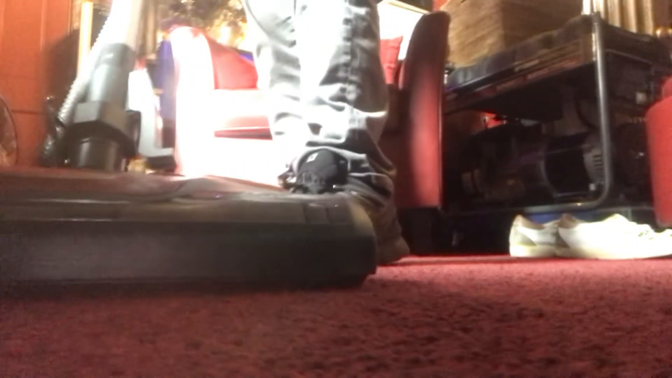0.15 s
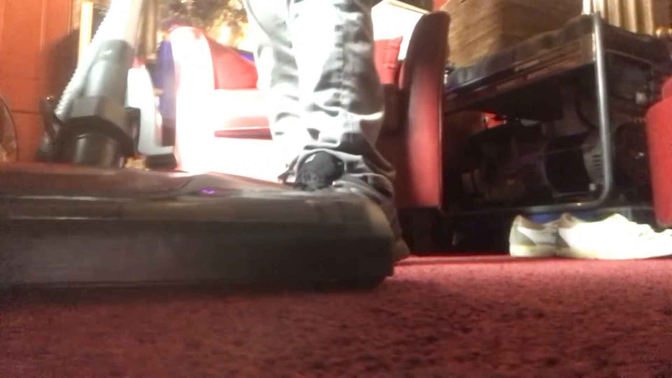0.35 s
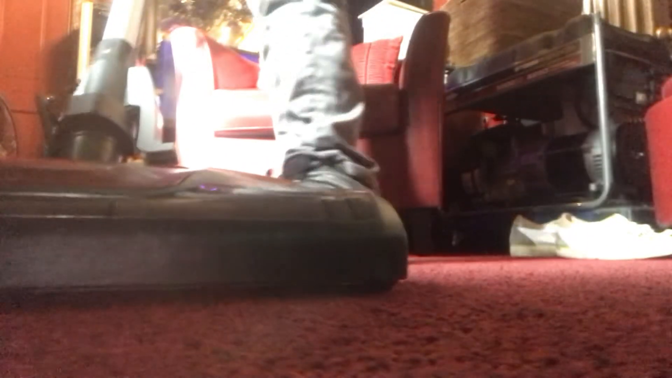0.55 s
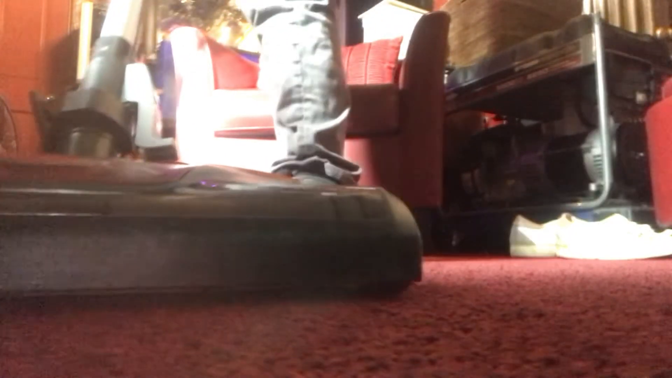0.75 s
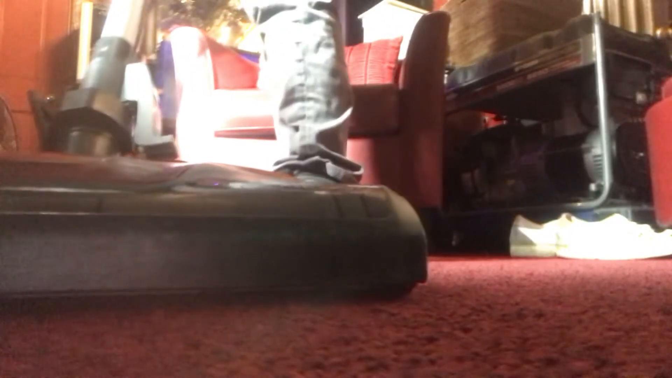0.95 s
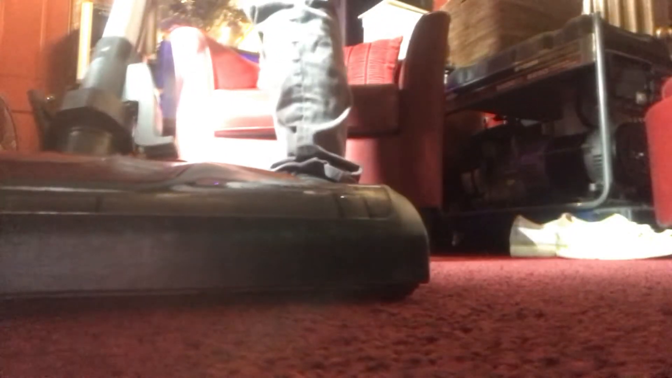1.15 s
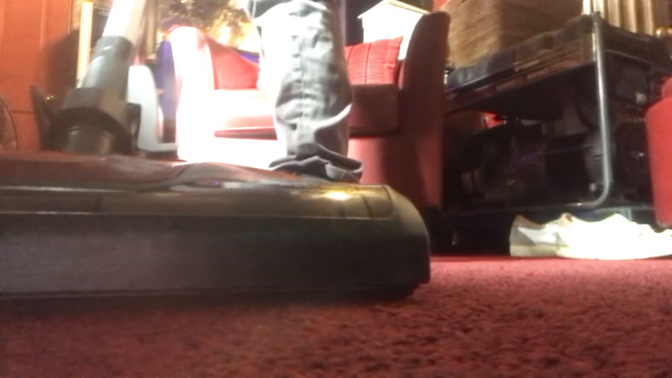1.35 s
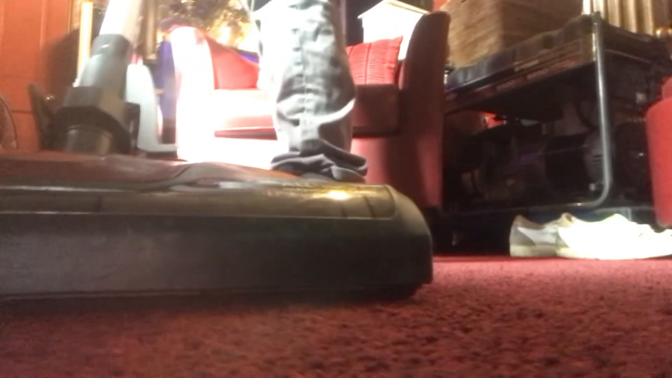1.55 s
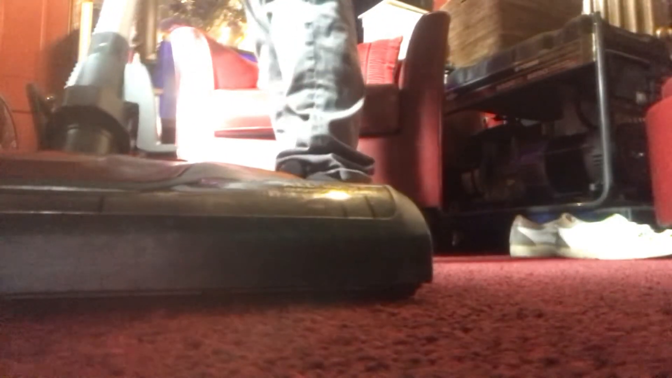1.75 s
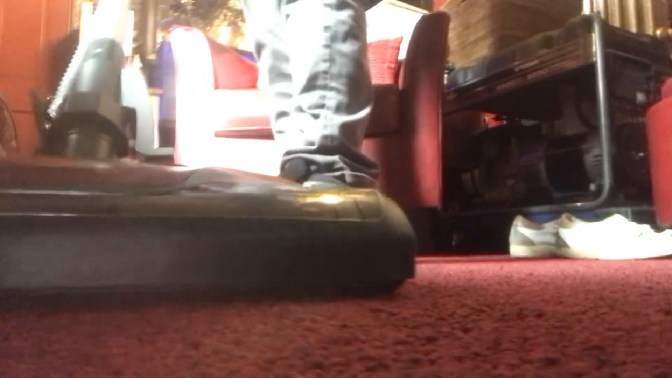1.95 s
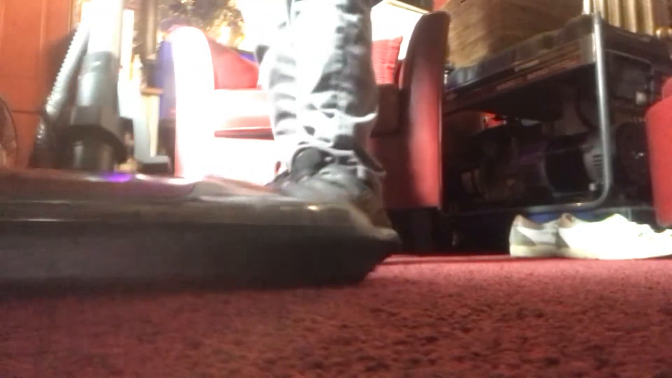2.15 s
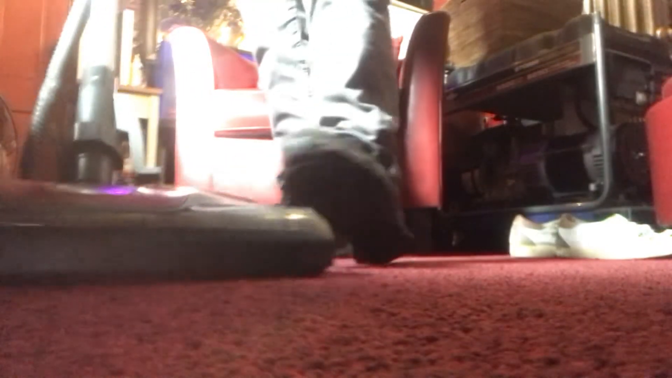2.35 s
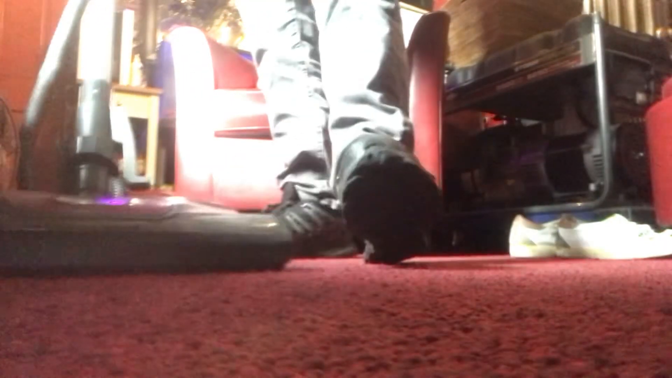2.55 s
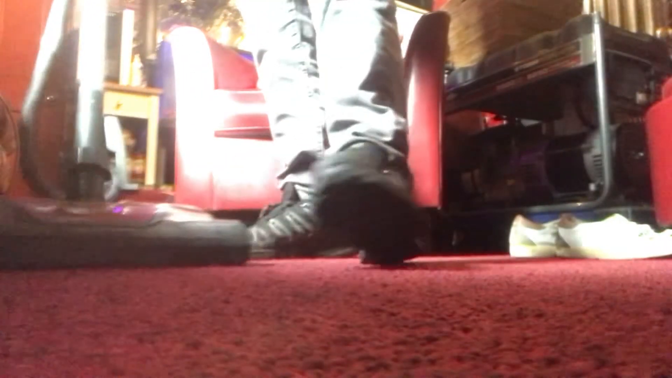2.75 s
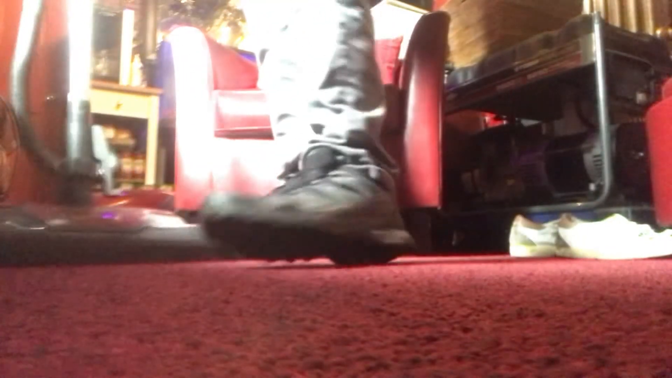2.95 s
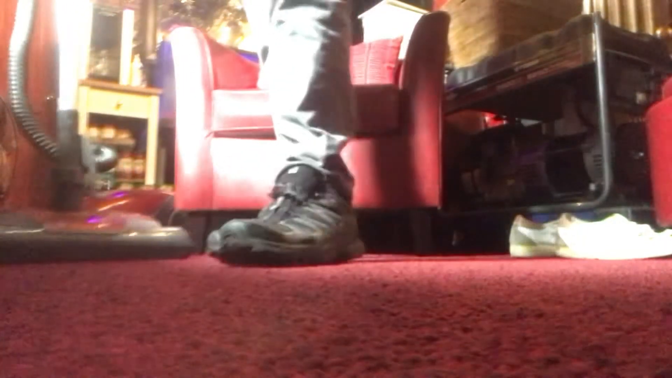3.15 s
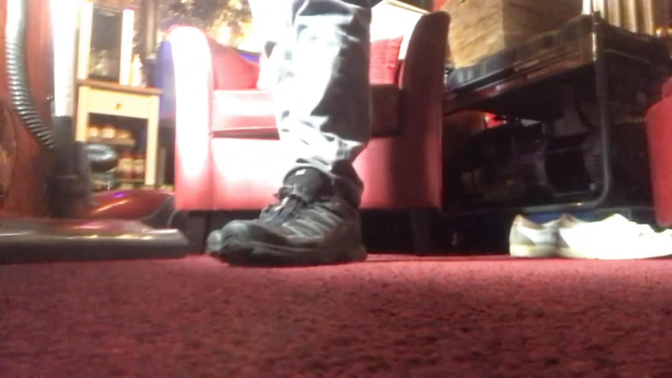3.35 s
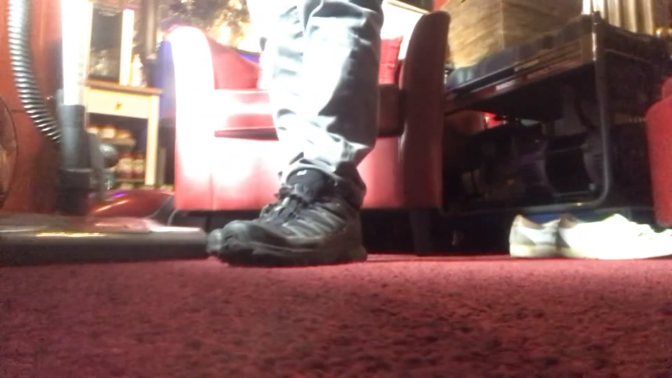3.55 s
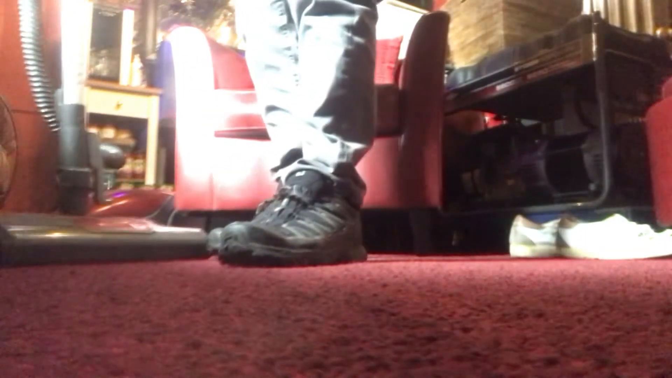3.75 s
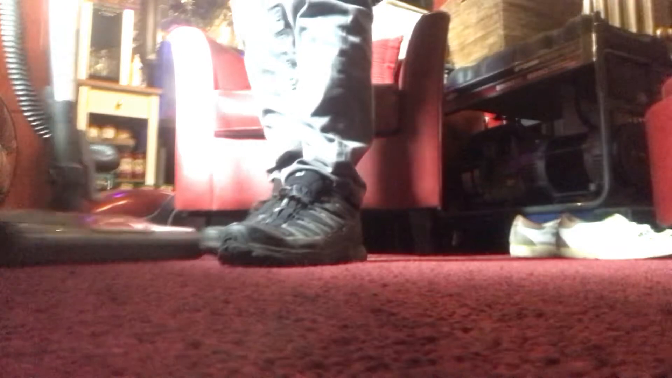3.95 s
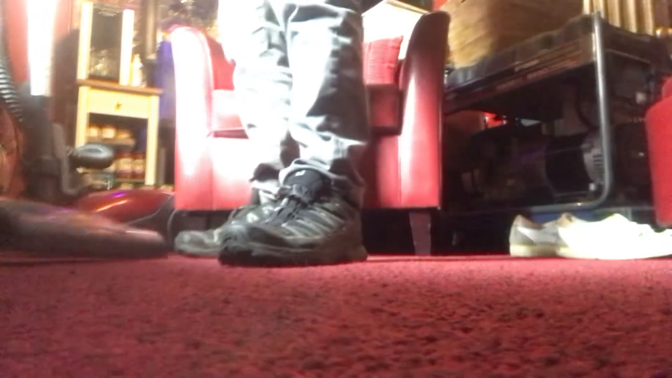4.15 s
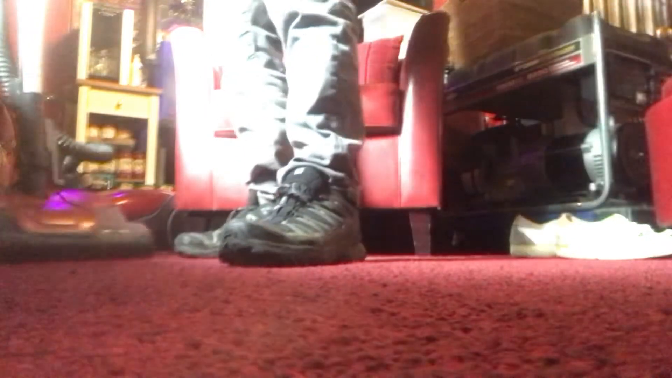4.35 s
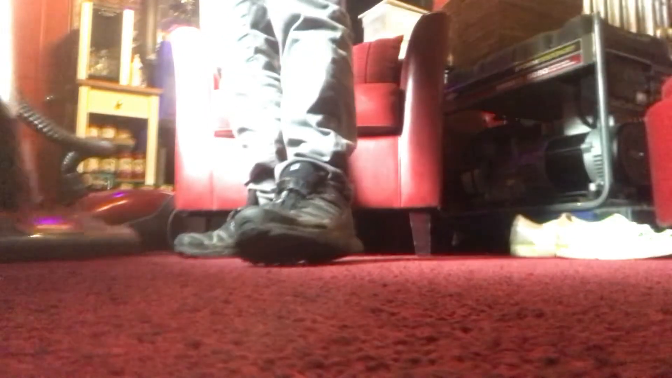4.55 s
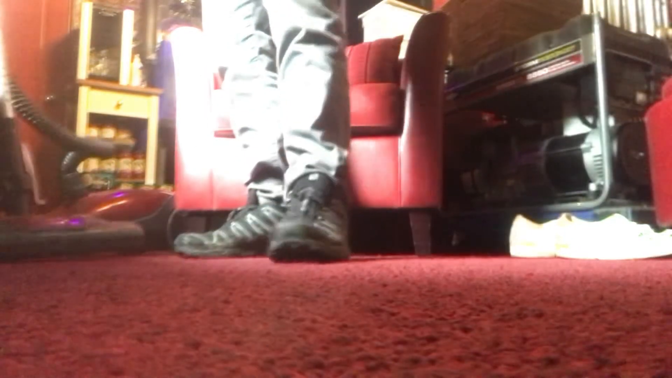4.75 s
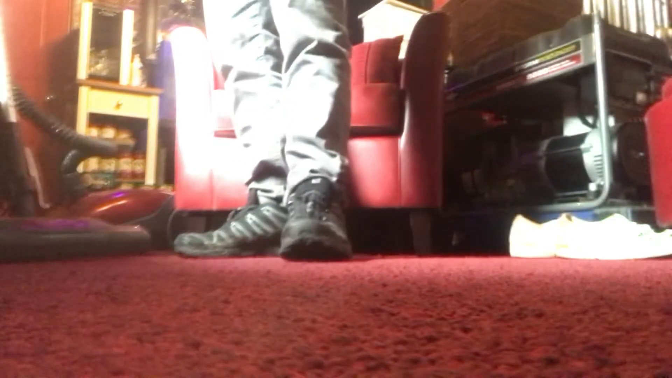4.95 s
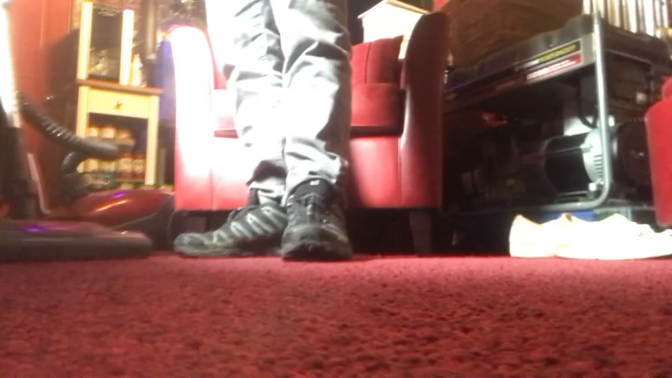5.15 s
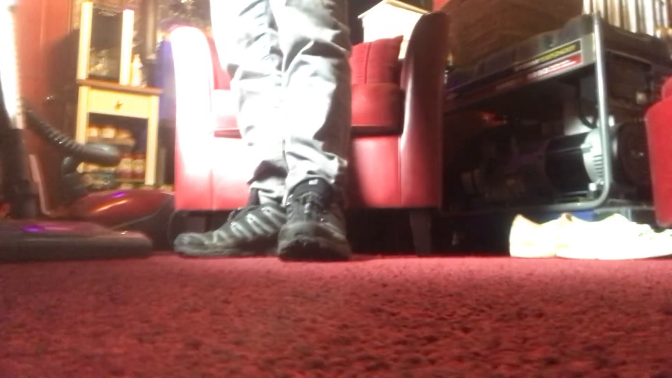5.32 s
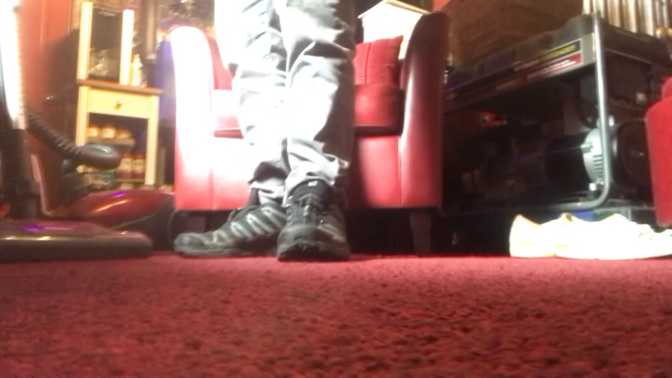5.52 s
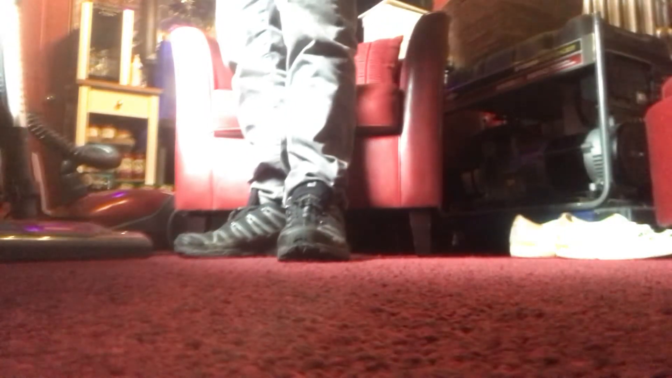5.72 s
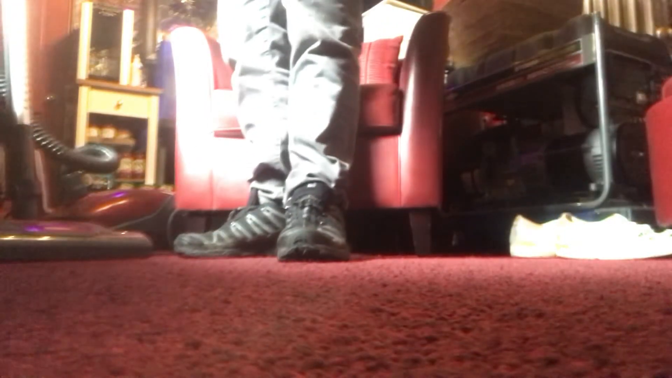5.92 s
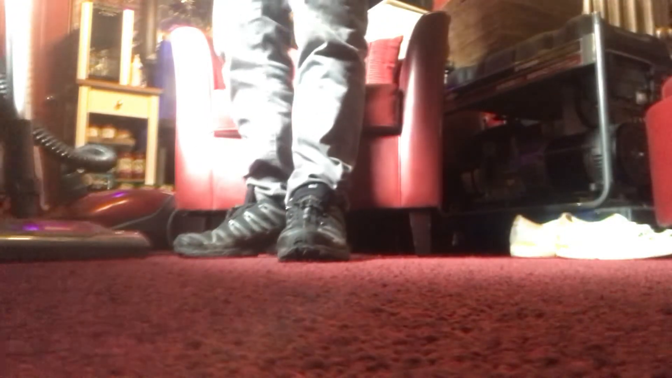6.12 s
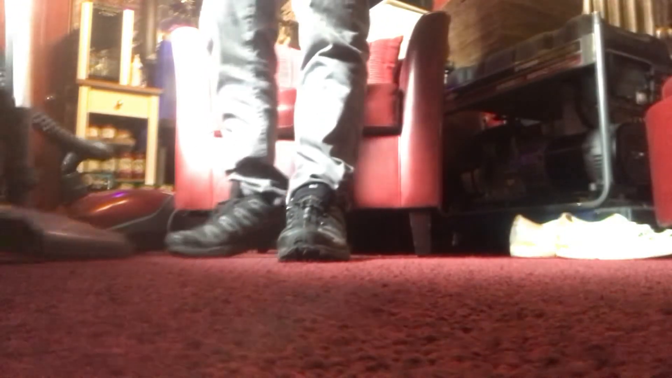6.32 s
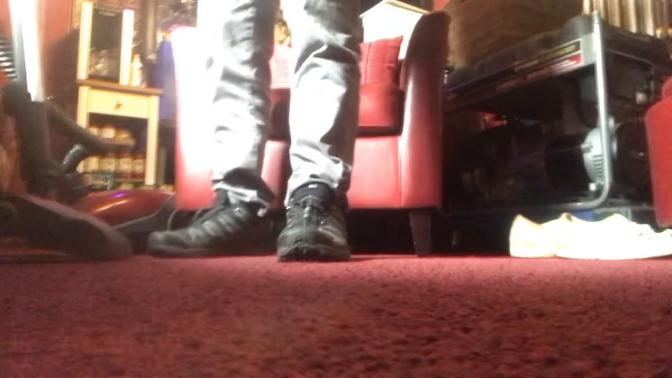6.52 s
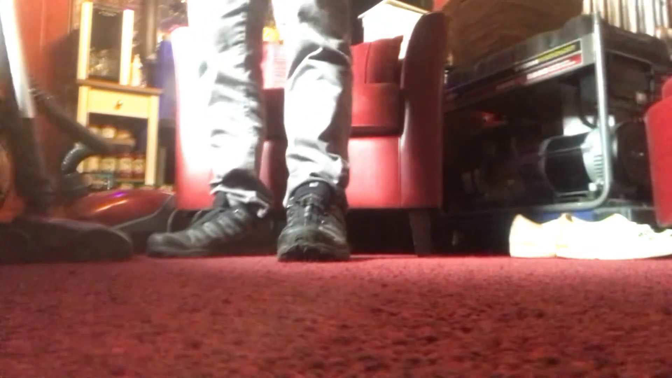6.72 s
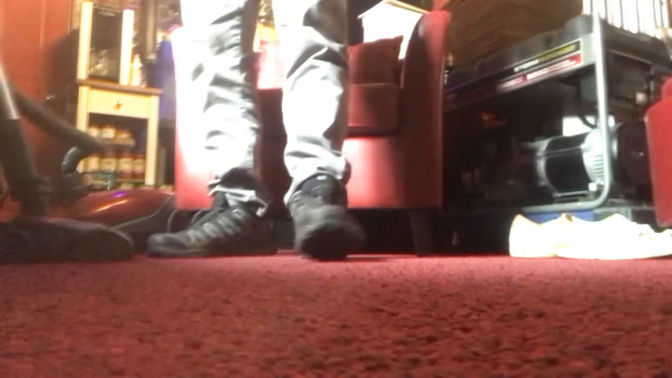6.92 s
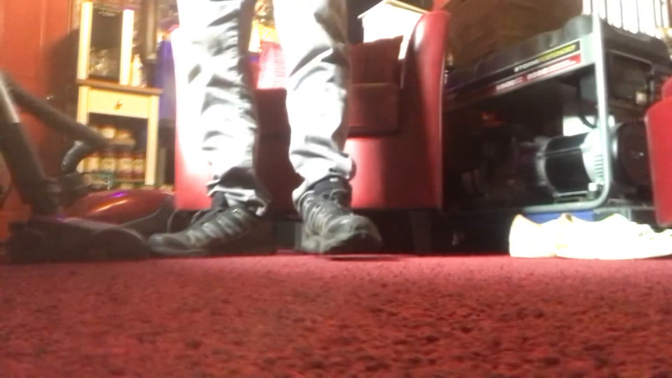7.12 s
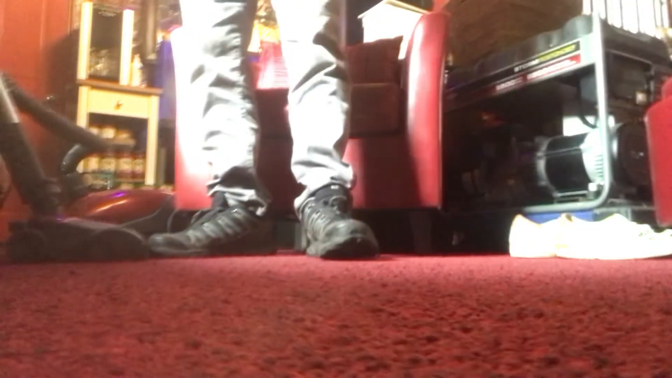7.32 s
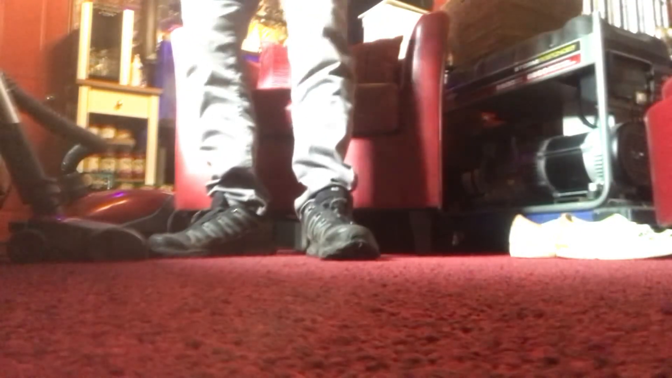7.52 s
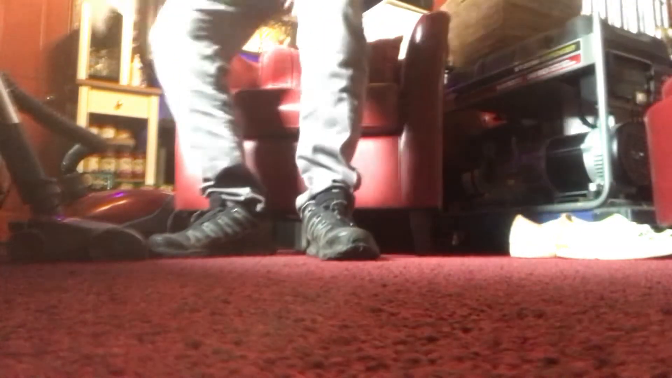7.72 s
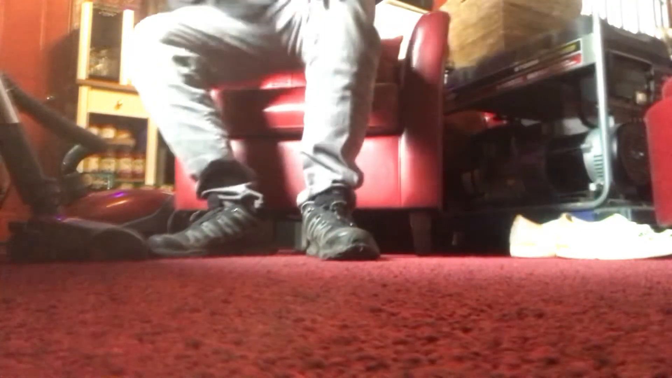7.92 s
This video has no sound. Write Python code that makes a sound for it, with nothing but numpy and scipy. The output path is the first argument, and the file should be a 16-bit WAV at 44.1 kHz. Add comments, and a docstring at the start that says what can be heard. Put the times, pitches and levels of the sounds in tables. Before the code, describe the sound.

A vacuum cleaner runs indoors, heard from floor level: a wavering brush buzz, rushing air, a thin whine and sharp ticks of grit. The brush moves away and stops, then the motor is cut and sinks in pitch as it spins down. Over a low room hum come a few plastic clicks and knocks, shoes and cloth rubbing on carpet, and a soft thump as someone sits down.

```python
"""A canister vacuum's powered brush head works a carpet close by: bristles beat, grit ticks, the fan whines.
From about 2 s the head is drawn back. At 3.2 s its roll loses power and the pile brakes it to a stop.
At 3.5 s the suction fan is switched off; its tones and rush of air fall as it coasts down.
Clicks of hose, wand and shoes, shuffling and, at 7.8 s, a soft thump follow over a quiet room's hum."""
import sys
import numpy as np
from scipy import signal
from scipy.io import wavfile
from scipy.ndimage import uniform_filter1d

SR = 44100
rng = np.random.default_rng(int(sys.argv[2]) if len(sys.argv) > 2 else 0)


def wav_out(sig):
    """Save sig, one row per channel (or a flat mono array), as 16-bit PCM at SR to the path in sys.argv[1]."""
    wavfile.write(sys.argv[1], SR, np.round(np.clip(np.atleast_2d(sig).T, -1, 1) * 32767).astype(np.int16))


N = 356239
T = np.arange(N) / SR

# Powered brush roll. Each row: time in seconds, beat rate in Hz, regular share 0-1, buzz swell in dB,
# lean from the third to the second harmonic in dB.
ROLL_PATH = [(0, 164.3, .9, -1.5, -2.5), (.15, 162.5, 0.93, 2, -0.5), (.28, 156.1, 0.92, 1, 5),
             (.43, 153.7, 0.75, -1.5, 7.5), (.65, 151.5, 0.78, -0.5, 3.5), (.82, 152.7, 0.93, 1, -1.5),
             (1.3, 155.5, 0.93, -1, -2), (1.63, 155.7, 0.87, -2, -1.5), (1.8, 159.1, 0.89, -1, 1),
             (2.1, 163.9, 0.55, -.5, 4.5), (2.56, 164.6, 0.51, -1, 5.5), (2.9, 181.1, 0.37, -1.5, 4.5),
             (3.19, 190.8, 0.21, 0.5, 8)]
# Head position. Each row: time in seconds, nearness in dB.
NEARNESS = [(0, 3), (.4, 2.5), (1.2, 7), (1.7, 5), (2.0, 1.5), (2.4, -2), (2.75, -8.5), (3.2, -9.5)]
# Overtone flutter, low while the head rests. Each row: time in seconds, share of power 0-1.
FLUTTER_SHARE = [(.78, .55), (.9, .03), (1.7, .03), (1.85, .15)]
# Bristle beat. Each row: harmonic, powered level in dB, coasting level in dB,
# loss in dB per octave of slowing, sway in dB for a fully irregular roll.
BEAT_HARMONICS = [(1, -21.5, -20.5, 4.5, 3), (2, -29.5, -23.5, 18, 4), (3, -21, -24, 17, 4)]
# Drive whines. Each row: multiple of the beat rate, base level in dB.
BELT_WHINES = [(68.5, -56), (78, -65), (84, -57), (88, -57)]
# Grit hitting the housing. Each row: start in seconds, peak in dB.
GRIT_HITS = [(0.087, -14), (0.173, -14), (0.197, -11), (0.247, -19), (0.2605, -15), (0.273, -13.5),
             (0.298, -14.5), (0.4195, -15), (0.5166, -13.5), (0.556, -10), (0.5829, -14), (0.6205, -12),
             (0.6472, -11.5), (.6993, -14.5), (0.7715, -11), (0.8634, -14.5), (0.8903, -8), (0.917, -17),
             (1.11, -10), (1.1497, -15.5), (1.4251, -13), (1.4517, -15), (1.697, -15.5), (1.7668, -14),
             (2.3442, -18.5), (3.1133, -22), (3.249, -17)]
# Hose, wand and shoe knocks. Each row: start in seconds, crack, clack and thud peaks in dB,
# length in seconds.
KNOCKS = [(3.858, -24, -51, -44, 0.0049), (4.579, -40, -27.5, -28.5, 0.019),
          (4.603, -34.5, -46, -29, 0.0027), (5.191, -26, -48, -59, 0.0073),
          (5.204, -48, -39.5, -33.5, 0.017), (5.974, -49, -45, -54, 0.034),
          (6.012, -32.5, -42, -55, 0.00092), (6.685, -50, -29, -25.5, 0.022),
          (6.708, -40, -35, -29, 0.0095), (7.088, -58, -41.5, -42, 0.019), (7.124, -60, -46, -42, 0.0067),
          (7.623, -40.5, -38, -53, 0.0015), (7.966, -56, -56, -44, 0.035)]
# Shoes, cloth and hose on carpet. Each row: start and length in seconds, level and treble gain in dB.
RUBS = [(3.9, 1.9, -54.5, -2.5), (4.3, 0.57, -49, -2), (5.95, 0.416, -52, -4), (5.8, 1.4, -57, -5.5),
        (7.6, .6, -61.5, 9)]

# Resonances. Each row: frequency in Hz, bandwidth in Hz, gain in dB.
CRACK_MODES = [(4070, 800, 1), (5450, 450, 8), (6520, 1500, 3.5), (9460, 4500, 3), (12140, 900, 2)]
PLASTIC_MODES = [(374, 110, 6.5), (560, 130, 10), (1660, 590, 6.5), (2176, 720, 2), (3300, 900, -11)]

# Responses. Each row: frequency in Hz, gain in dB.
HOUSING_GAIN = [(40, -20), (780, 3), (1000, -6.5), (1200, -16.5), (1550, -9.5), (2550, -19.5), (2900, -29),
                (3800, -40)]
HEAD_RADIATION = [(10, -52), (60, -37), (110, -19), (145, 0), (2000, 1)]
SHAFT_GAIN = [(120, -80), (160, -46.5), (243, -44.5), (277, -36.5), (327, -31), (402, -28), (468, -38),
              (560, -25.5)]  # canister and room, for the shaft tone
BLADE_GAIN = [(1440, -78), (2000, -69), (2350, -56), (2700, -62), (3050, -54), (3400, -57), (3700, -50),
              (4050, -59), (4650, -53), (4900, -66), (5050, -57)]  # the same for the blade tone

# Noise spectra. Each row: frequency in Hz, relative density in dB.
SCRUB_SPECTRUM = [(40, -32), (550, -3.5), (850, -2), (1200, -16), (1500, -8), (2500, -16.5), (3000, -23.5),
                  (4900, -24.5)]
AIR_SPECTRUM = [(400, -10.5), (600, 2), (2500, -1.5), (3100, -17), (5600, -17), (11500, -20.5),
                (16000, -23)]
CLOTH_SPECTRUM = [(250, -16.5), (550, 3.5), (750, -9), (2500, -16), (16000, -41)]
ROOM_SPECTRUM = [(20, -52), (50, 4.5), (220, 3), (600, -0.5), (730, -19.5), (1300, -13.5), (2600, -29),
                 (3200, -29), (16000, -44)]

# Room tones. Each row: frequency in Hz, level in dB.
ROOM_TONES = [(226.1, -57), (382.2, -54), (893.6, -70)]

BRUSH_OFF_S, FAN_OFF_S, ROLL_STOP_S = 3.21, 3.5, 3.84
LOADED_BEAT_HZ, COAST_BEAT_HZ = 168.4, 191.9
FAN_HZ, BLADES = 556.2, 9
POWERED = T < BRUSH_OFF_S


def brush(settle_s=0.021):
    """Two bristle rows each strike the pile once a turn: beat tones, housing buzz and belt whine."""
    hz, regular = roll_motion()
    _, _, swell_db, lean_db = curves(ROLL_PATH)
    flutter_share = curves(FLUTTER_SHARE)[0]
    off = np.clip((T - BRUSH_OFF_S) / settle_s + .5, 0, 1)  # the unpowered roll settles into the pile
    on = 1 - off
    lift_hz = np.maximum(curves(ROLL_PATH)[0] - LOADED_BEAT_HZ, 0)  # a faster roll has left the pile
    slowed_oct = np.log2(COAST_BEAT_HZ / hz)
    beats = np.cumsum(hz + 2.17 * (1 - regular) * drift(per_s=30)) / SR  # the pile tugs at the roll
    bright_db = on * curves(NEARNESS)[0] - 6 * off
    buzz_db = on * (-20 + swell_db - 0.14 * lift_hz) + off * (-17.5 - 9 * slowed_oct)
    buzz = treble_shelf(housing_buzz(hz, beats, regular, flutter_share), 1200, bright_db)
    out = amp(buzz_db) * buzz + belt_whine(hz, bright_db)
    for row, lift_db_per_hz, lean in zip(BEAT_HARMONICS, (0.66, 0.43, 0.13), (0, 1, -.4)):
        k, db, coast_db, db_per_oct, sway_db = row
        powered_db = db + lean * lean_db - lift_db_per_hz * lift_hz
        level_db = on * powered_db + off * (coast_db - db_per_oct * slowed_oct)
        sway = amp(sway_db * (1 - regular) ** (1 / k) * drift(per_s=24))
        sway *= flutter(flutter_share * POWERED * (k > 1) / 2)
        out += amp(level_db) * sway * colour(HEAD_RADIATION, k * hz) * tone(k * beats)
    return np.clip((ROLL_STOP_S - T) / 0.062, 0, 1) * out


def roll_motion(brake_hz_per_s=205, extra_hz_per_s=85):
    """Beat rate and regular share: motor-held, then braked by the pile, harder once suction is cut."""
    hz, regular = curves(ROLL_PATH)[:2]
    lost_hz = brake_hz_per_s * (T - BRUSH_OFF_S) + extra_hz_per_s * np.maximum(T - FAN_OFF_S, 0)
    coast_hz = np.clip(COAST_BEAT_HZ - lost_hz, 20, COAST_BEAT_HZ)
    return np.where(POWERED, hz, coast_hz), np.where(POWERED, regular, 0.89 * coast_hz / COAST_BEAT_HZ)


def housing_buzz(hz, beats, regular, flutter_share):
    """Overtones of the turn through the plastic head; an irregular roll chops them and scrubs more."""
    odd_db = np.where(POWERED, -6, -13)  # the two rows differ, less so when coasting
    rolloff_db = 1.2 * ~POWERED  # softer beats lose their upper overtones
    # Overtone 10 swells as the head starts or stops.
    swell_db = sum(5 * np.exp(-((T - s) / .06) ** 2) for s in (0.23, 0.86, 1.83))
    accent_db = {10: swell_db, 43: 13}
    buzz, power = np.zeros(N), np.full(N, 1e-9)
    for k in [3, 5, *range(7, 46)]:
        overtone_hz = hz * k / 2
        gain = colour(HOUSING_GAIN, overtone_hz) * amp(odd_db * (k % 2) - rolloff_db * max(k - 12, 0))
        power += gain ** 2 * (overtone_hz > 600)
        gain *= flutter(flutter_share / 2 if k == 10 else flutter_share)
        chop_db = 5 * (1 - regular) * drift(per_s=25)
        buzz += gain * amp(accent_db.get(k, 0) + chop_db) * tone(beats * k / 2)
    scrub = noise(SCRUB_SPECTRUM, patchy_db=1, lo_hz=600, hi_hz=2700)
    scrub *= evened(1 + 0.12 * np.cos(2 * np.pi * beats))  # each row scrapes in turn
    return np.sqrt(regular / power) * buzz + np.sqrt(1 - regular) * scrub


def belt_whine(beat_hz, bright_db, casing_hz=13700, width_hz=1000):
    """Thin drive tones, let out by the casing in one band; one stands out as the drive coasts."""
    coast_hz = COAST_BEAT_HZ * (1 - 2.1 * (T - BRUSH_OFF_S) ** 2)
    hz = np.where(POWERED, beat_hz, coast_hz) * (1 + .0015 * drift(per_s=120))
    out = np.zeros(N)
    for k, db in BELT_WHINES:
        level_db = db + np.where(POWERED, bright_db / 4, 9 if k == 78 else -31) + 4 * drift(per_s=9)
        casing = np.exp(-((k * hz - casing_hz) / width_hz) ** 2)
        out += amp(level_db) * casing * tone(k * np.cumsum(hz) / SR)
    return out


def grit(dust_share=0.45):
    """Grains crack against the housing; fine dust ticks on some turns of the powered roll."""
    cracks = bursts([(s, db, .0012) for s, db in GRIT_HITS], CRACK_MODES, decay_s=0.0026, order=1)
    turns = np.cumsum(roll_motion()[0] / 2) / SR
    new_turn = np.diff(np.floor(turns), prepend=0) > 0
    size = amp(3.5 * np.minimum(rng.exponential(1, N), 2.5))
    thrown = new_turn * (rng.random(N) < dust_share)
    ticks = signal.oaconvolve(size * thrown, np.hanning(160))[:N] * rng.standard_normal(N)
    dust_db = -51 + .8 * curves(NEARNESS)[0]
    return cracks + amp(dust_db) * evened(ring(ticks, CRACK_MODES)) * POWERED


def fan(exhaust_hz=6400, width_hz=950):
    """Shaft tone, blade tone with its octave, and air; drag slows the wheel once power is cut."""
    near_db = curves(NEARNESS)[0]
    screen_db = near_db - NEARNESS[-1][1]  # the near head screens the canister
    coast_s = np.maximum(T - FAN_OFF_S, 0)
    hz = uniform_filter1d(FAN_HZ / (1 + 0.89 * coast_s + .15 * coast_s ** 2), size=4000)
    turns = np.cumsum(hz * (1 + 0.00104 * drift(per_s=8.8))) / SR
    jitter = np.cumsum(.007 * hz * (coast_s > 0) * drift(per_s=150)) / SR  # less pure when coasting
    passes = BLADES * (turns + jitter)
    exhaust = amp(-7) * np.exp(-((2 * BLADES * hz - exhaust_hz) / width_hz) ** 2)
    blades = tone(passes) + exhaust * tone(2 * passes)
    shaft = colour(SHAFT_GAIN, hz) * amp(2.11 * drift(per_s=24)) * tone(turns)
    blades *= colour(BLADE_GAIN, BLADES * hz) * amp(2.5 * drift(per_s=45) - 7 * screen_db)
    return shaft + blades + air_rush(hz, near_db, screen_db)


def air_rush(fan_hz, near_db, screen_db, echo_s=.000385, db_per_oct=13.5):
    """Suction noise: thin near the nozzle, hollow from afar through an inverted echo in the hose."""
    body_db = -8 - 0.24 * near_db
    rush = noise(AIR_SPECTRUM, patchy_db=1.5, lo_hz=3500, hi_hz=15000)
    rush = amp(body_db) * treble_shelf(rush, 3000, -body_db)
    echo = .3 * amp(-screen_db / 2) * np.roll(rush, round(echo_s * SR))
    level_db = -42 + 0.48 * near_db - db_per_oct * np.log2(FAN_HZ / fan_hz)
    return amp(level_db) * evened(rush - echo) * np.std(rush)


def knocks():
    """Hose, wand and shoe contacts: a bright crack, a plastic clack and a hollow thud each."""
    start_s, crack_db, clack_db, thud_db, length_s = np.transpose(KNOCKS)
    cracks = bursts(zip(start_s, crack_db, length_s), CRACK_MODES, decay_s=0.0013, order=1)
    clacks = bursts(zip(start_s, clack_db, length_s), PLASTIC_MODES[2:], decay_s=0.003, order=2)
    thuds = bursts(zip(start_s, thud_db, length_s), PLASTIC_MODES[:2], decay_s=0.01, order=2)
    return cracks + clacks + thuds


def shuffles(rise_s=.15, fall_s=.05):
    """Shoes, cloth and hose rub the carpet in strokes of rough noise."""
    cloth = noise(CLOTH_SPECTRUM, patchy_db=2.5, lo_hz=450, hi_hz=3000)
    cloth *= evened(amp(2 * drift(per_s=90)))
    out = np.zeros(N)
    for start_s, length_s, db, treble_db in RUBS:
        stroke = np.clip(np.minimum((T - start_s) / rise_s, (start_s + length_s - T) / fall_s), 0, 1)
        out += amp(db) * stroke * treble_shelf(cloth, 3000, treble_db)
    return out


def thump(start_s=7.822, rest_hz=45, excess_hz=190, glide_s=.024, rise_s=.008, decay_s=.095):
    """A cushion gives: one soft, falling tone."""
    age_s = np.maximum(T - start_s, 0)
    hz = rest_hz + excess_hz * np.exp(-age_s / glide_s)
    swell = (1 - np.exp(-age_s / rise_s)) * np.exp(-(age_s / decay_s) ** 2)
    return amp(-42) * swell * tone(np.cumsum(hz) / SR)


def room():
    """Low murmur of the house with a few wavering tones."""
    hum = sum(amp(db + 2 * drift(per_s=12)) * tone(hz * T) for hz, db in ROOM_TONES)
    return amp(-50) * noise(ROOM_SPECTRUM, patchy_db=1.5) + hum


def reverberate(x, t60_s, wet_db):
    """Adds the short, dull tail of a furnished room."""
    t = np.arange(SR // 3) / SR
    tail = signal.lfilter([1], [1, -.4], rng.standard_normal(len(t))) * amp(-60 * t / t60_s) * (t > .004)
    return x + amp(wet_db) * signal.oaconvolve(x, tail / np.linalg.norm(tail))[:N]


def amp(db):
    """dB to gain."""
    return 10 ** (np.asarray(db) / 20)


def evened(x):
    """Scales to rms 1."""
    return x / np.sqrt(np.mean(x ** 2) + 1e-20)


def colour(points, hz):
    """Gain of a spectrum at hz, silent outside its ends."""
    f, db = np.transpose(points)
    return amp(np.interp(np.log(hz + 1), np.log(f + 1), db, -120, -120))


def curves(rows):
    """Columns of a timed table at every sample."""
    s, *columns = np.transpose(rows)
    return [np.interp(T, s, c) for c in columns]


def drift(per_s):
    """Smooth random curve of rms 1."""
    x = np.interp(T * per_s, np.arange(1000), rng.standard_normal(1000))
    return evened(uniform_filter1d(x, int(SR / per_s / 2) + 1))


def flutter(share):
    """Gain with a steady part and a drifting share of the power."""
    return np.sqrt(1 - share) + np.sqrt(share) * drift(per_s=13)


def tone(cycles):
    """Sine of rms 1, random start phase."""
    return np.sqrt(2) * np.sin(2 * np.pi * (cycles + rng.random()))


def noise(points, patchy_db, lo_hz=0., hi_hz=SR / 2):
    """Shaped noise with drifting patches; the band lo-hi has rms 1."""
    hz = np.fft.rfftfreq(1024, 1 / SR)
    real, imag, patches = rng.standard_normal((N // 256 + 5, 513, 3)).T
    patches = evened(uniform_filter1d(uniform_filter1d(patches, size=10, axis=0), size=8, axis=1))
    shape = colour(points, hz)
    spectra = (real + 1j * imag) * shape[:, None] * amp(patchy_db * patches)
    share = np.sum(shape[(hz >= lo_hz) & (hz <= hi_hz)] ** 2) / np.sum(shape ** 2)
    return evened(signal.istft(spectra, nperseg=1024, noverlap=768)[1][:N]) / np.sqrt(share)


def ring(x, modes):
    """Passes x through parallel resonances."""
    return sum(amp(db) * signal.lfilter(*signal.iirpeak(hz, hz / width, SR), x) for hz, width, db in modes)


def bursts(rows, modes, decay_s, order):
    """Noise bursts ring the modes, no two alike; a higher order is purer."""
    out, t = np.zeros(N + SR), np.arange(4096) / SR
    for start_s, peak_db, length_s in rows:
        shape = (1 + np.exp(-t / decay_s)) * np.exp(-np.maximum(t - length_s, 0) / decay_s)
        burst = rng.standard_normal(4096) * shape
        struck = [(hz * rng.uniform(.975, 1.025), width, db + rng.normal(0, 2)) for hz, width, db in modes]
        for _ in range(order):
            burst = ring(burst, struck)
        out[round(start_s * SR):][:4096] += amp(peak_db) * burst / abs(burst).max()
    return out[:N]


def treble_shelf(x, hz, db):
    """Changes the level above hz by db."""
    high = signal.sosfiltfilt(signal.butter(4, hz, "high", fs=SR, output="sos"), x)
    return x + (amp(db) - 1) * high


def scene():
    """Mono mix; only the contact sounds reverberate."""
    vacuum = brush() + fan()
    contacts = grit() + knocks() + shuffles() + thump()
    return (vacuum + reverberate(contacts, t60_s=0.11, wet_db=-11.5) + room())[None]


def record(dry):
    """Steep low-pass at 15.78 kHz."""
    return signal.oaconvolve(dry, signal.firwin(511, 15780, window=("kaiser", 8), fs=SR)[None], "same")


dry = scene()
out = record(dry)
wav_out(out)
```